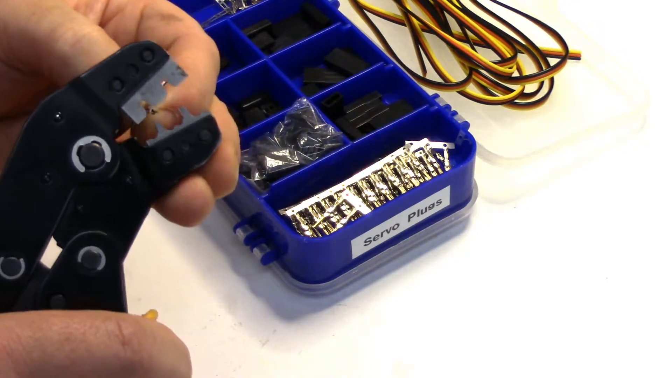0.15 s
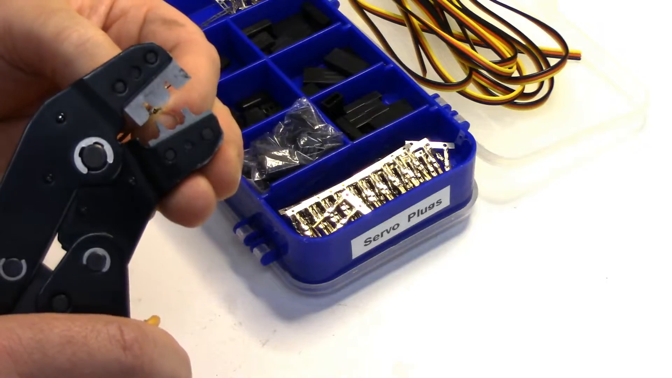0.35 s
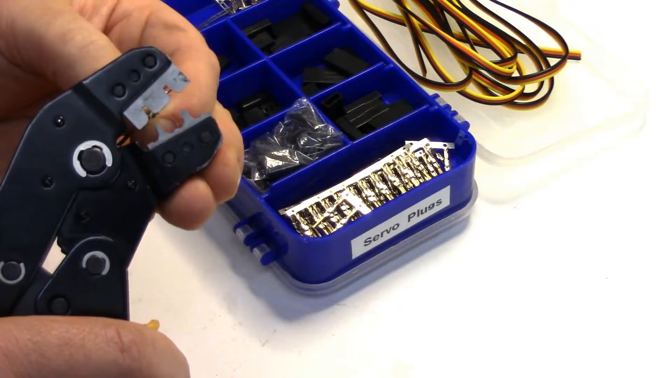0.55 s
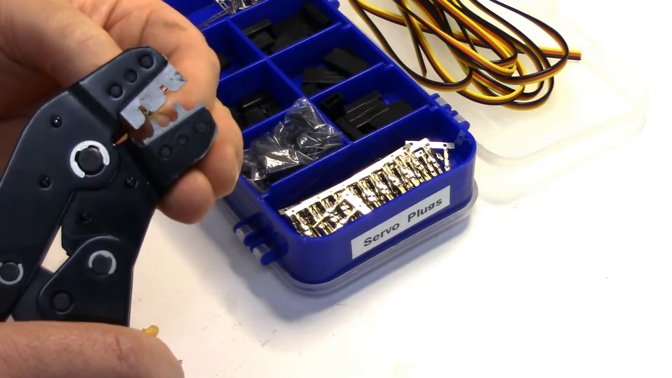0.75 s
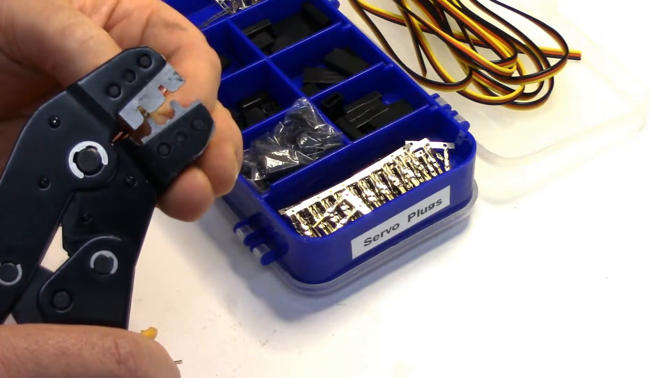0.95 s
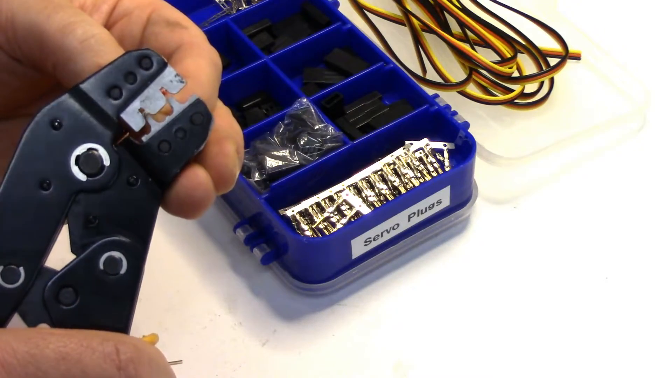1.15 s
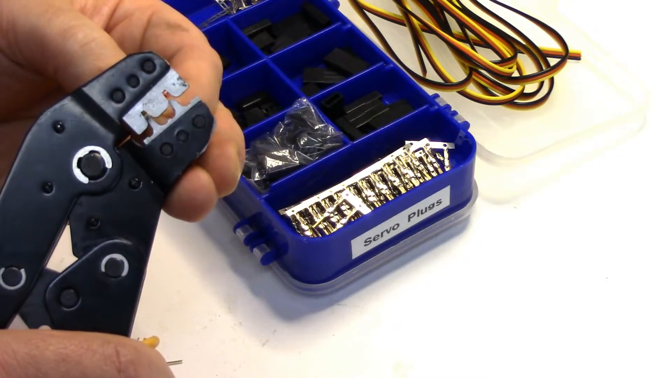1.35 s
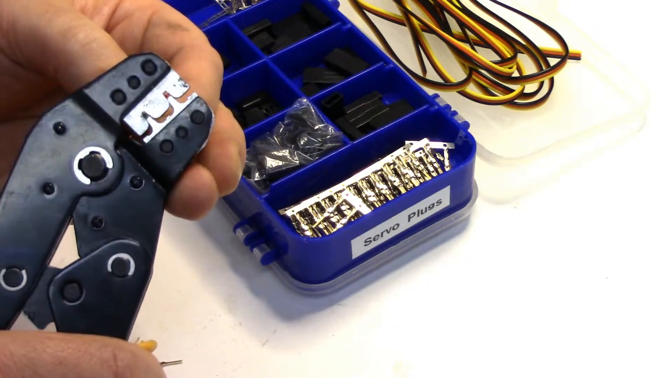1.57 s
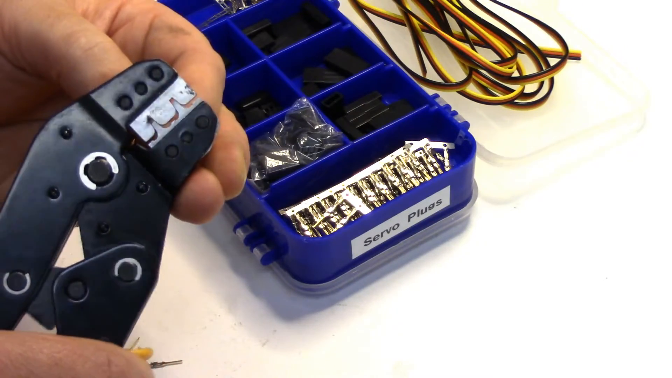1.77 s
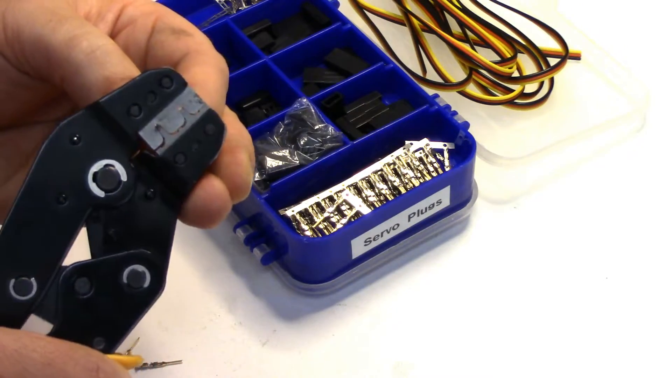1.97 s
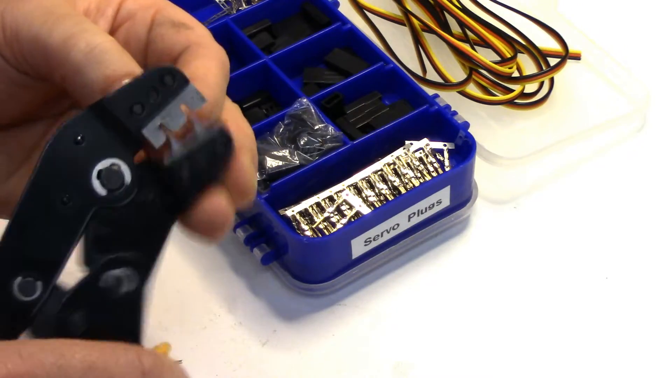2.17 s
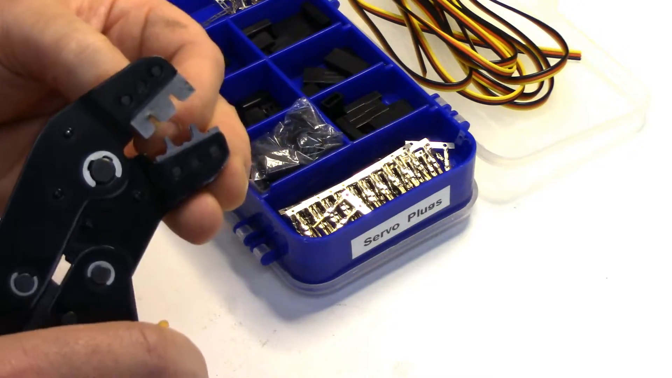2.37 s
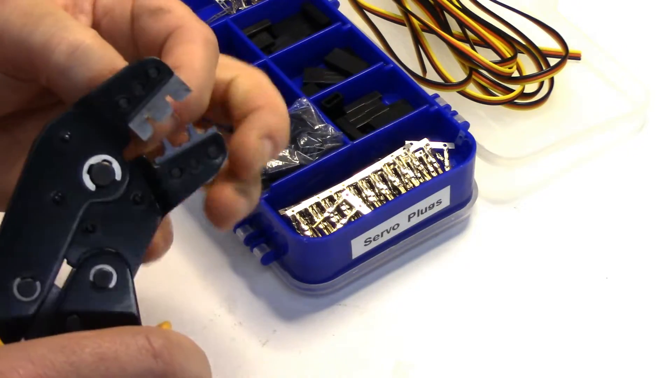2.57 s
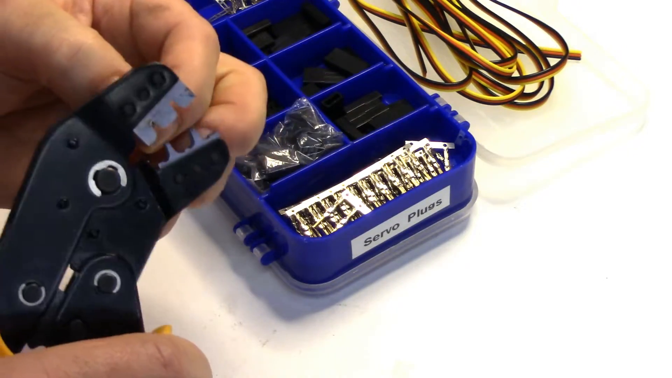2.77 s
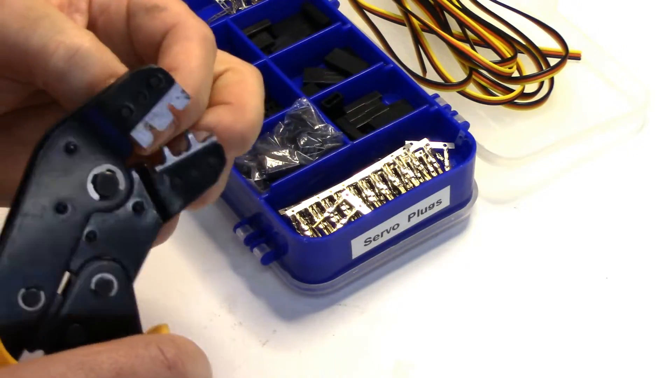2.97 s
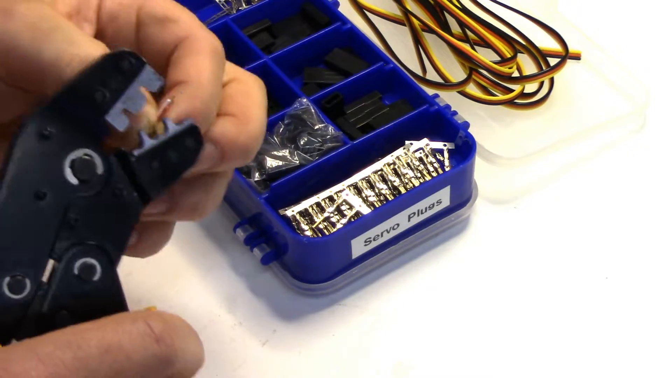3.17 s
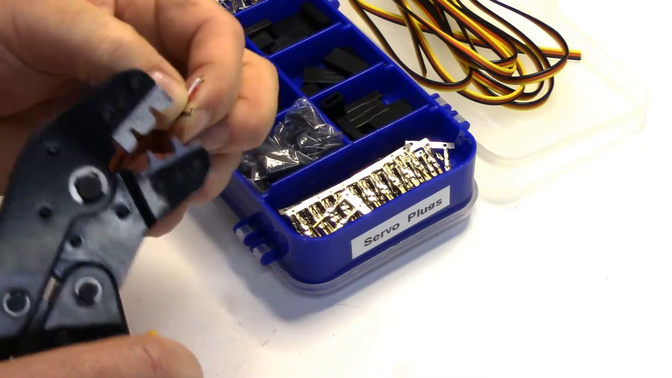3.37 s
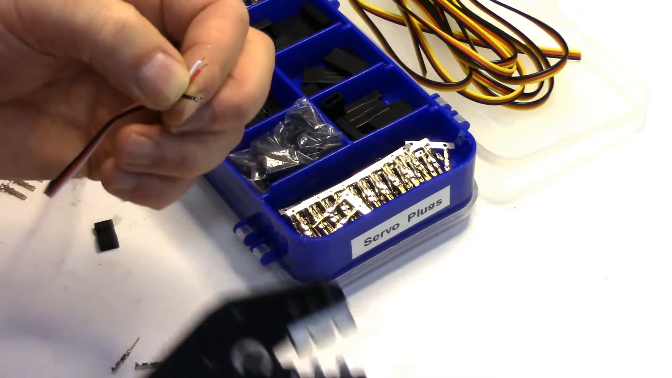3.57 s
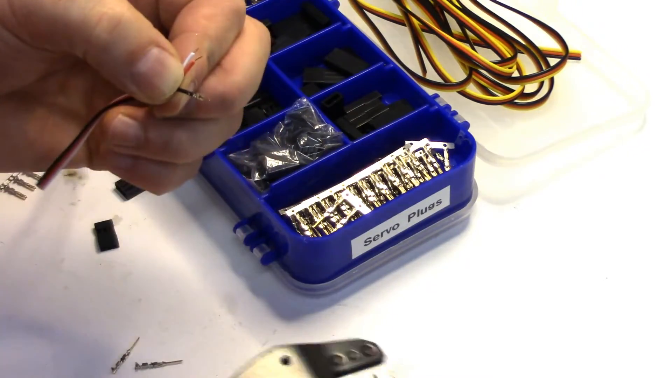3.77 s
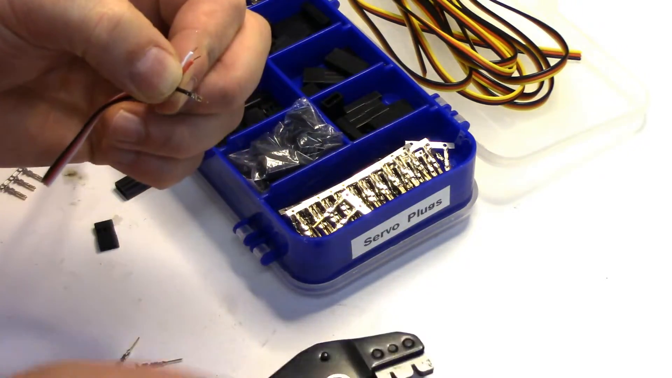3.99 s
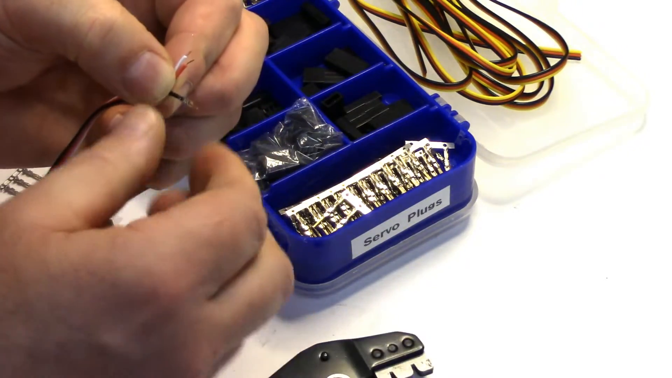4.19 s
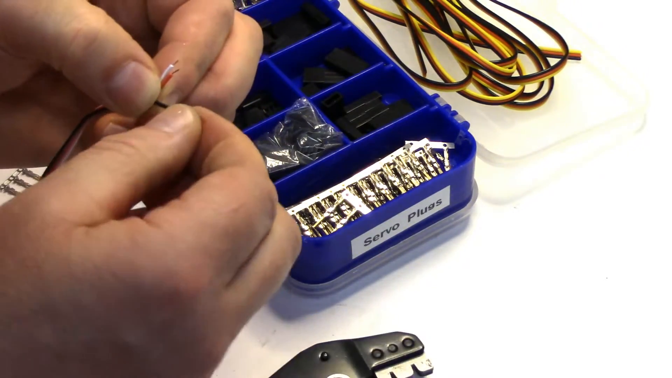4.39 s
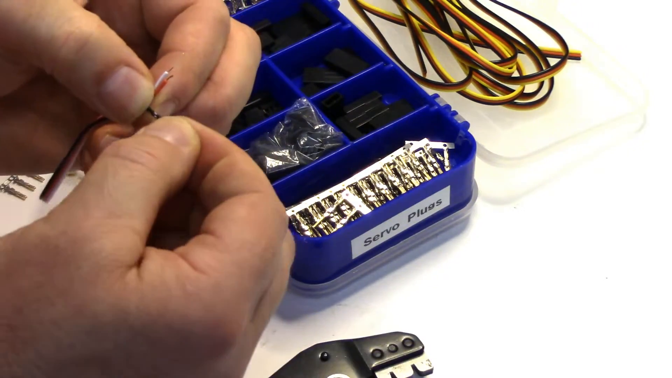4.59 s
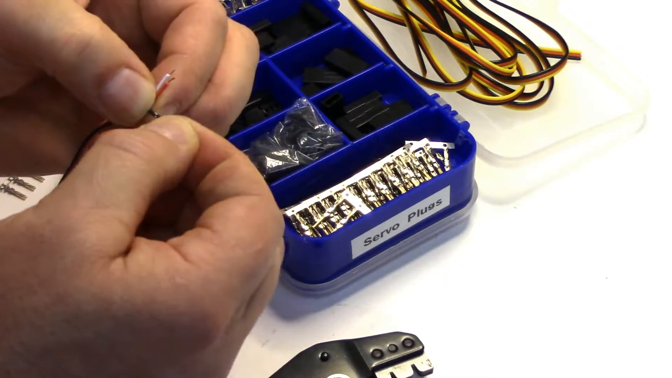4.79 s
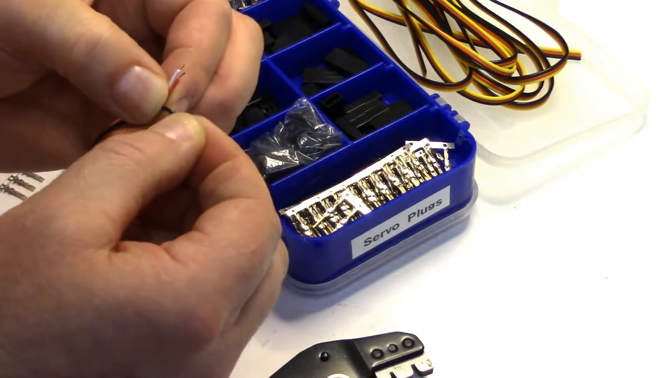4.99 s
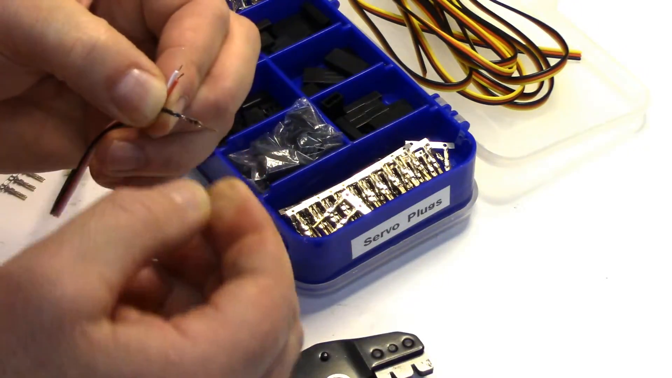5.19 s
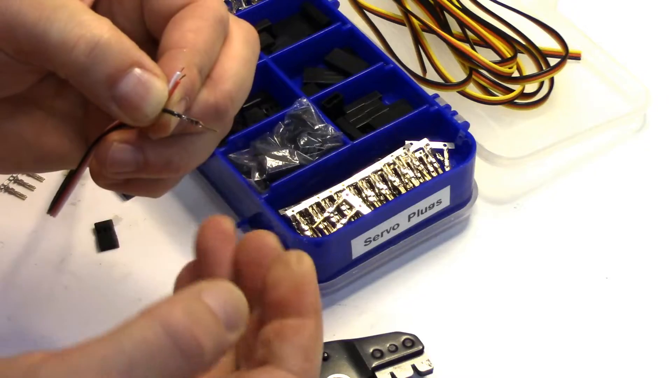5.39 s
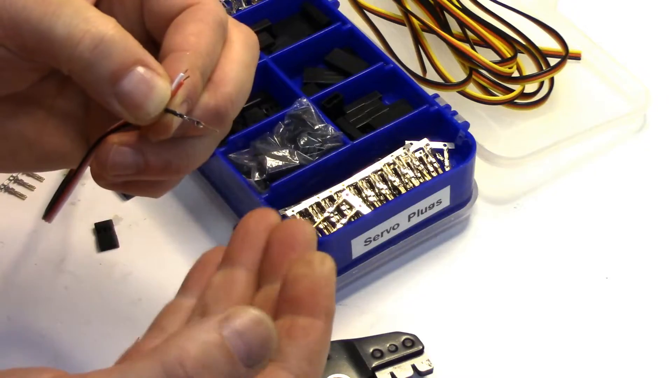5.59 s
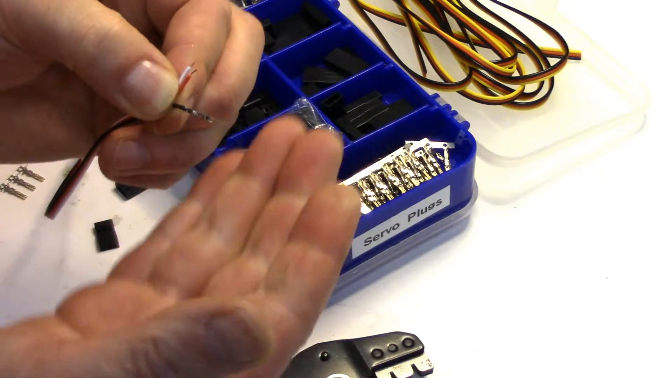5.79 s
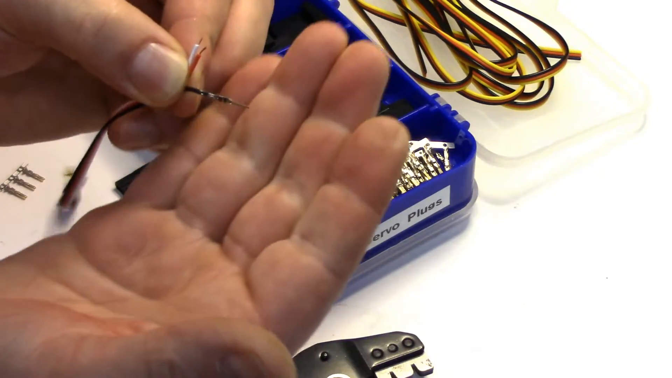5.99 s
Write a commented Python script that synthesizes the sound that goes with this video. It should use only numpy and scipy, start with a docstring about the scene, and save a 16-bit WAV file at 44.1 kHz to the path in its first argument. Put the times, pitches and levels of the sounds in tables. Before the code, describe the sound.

Close stereo microphones in a small live room with soft fan air and low hum. A hand crimper gives one bright steel click at about one second, more clicks, then a hard double snap as the jaws close. The spring throws it open with a rapid rattle and thin singing ring. The tool then thuds and clacks onto a wooden bench, rocking to rest; faint pips continue over the hiss.

```python
"""Fan air, hum and a low drone are heard first, with a faint spring tone; then a steel ratchet crimper is squeezed:
its pawl snaps over teeth, the jaws close, the handles stop, and the spring throws them open with a rattle.
The tool drops on a wooden bench and rocks to rest, among faint pips. Impacts are noise bursts through filters
plus decaying sine modes; the spring is a sine of shivering pitch; the air and rubs are coloured noise.
A small live room answers the impacts and pips, and two close microphone ports receive the whole."""
import sys
import numpy as np
from scipy import signal
from scipy.fft import rfft, irfft, next_fast_len
from scipy.io import wavfile
from scipy.ndimage import map_coordinates

SR = 44100
rng = np.random.default_rng(int(sys.argv[2]) if len(sys.argv) > 2 else 0)


def store_pcm(level_fs):
    """Save levels as 16-bit WAV."""
    pcm = np.round(np.clip(level_fs, -1, 1) * 32767).astype(np.int16)
    wavfile.write(sys.argv[1], SR, np.atleast_2d(pcm).T)


N = 266760
T = np.arange(SR) / SR  # time since a contact, s

# The pawl drops over one ratchet tooth. Each row: start in seconds, strength in dB, brightness in dB per octave.
TOOTH_SNAPS = [(1.1612, 8, 3), (1.4797, 6.5, 1.5), (1.589, 4, 2), (1.815, 4.5, 1.66)]
TOOTH_RING_DB = -35  # frame ring against the crack
# The jaws bottom out in two steps. Each row: start in seconds, strength in dB.
JAW_CLOSINGS = [(1.8506, 5.5), (1.8732, 12)]
# Frame ring, brightness per octave, ring of the clamped jaws, all against the closing's strength
CLOSE_RING_DB, CLOSE_TILT_DB, JAW_DB = -40, 1.5, -23.5
STOP_S, STOP_DB, STOP_JAW_DB = 1.887, -12, -20.5  # handles reach their stop: time, thump, jaw ring
# The released linkage rattles open: start, strength, spacing, brightness per octave gained at each contact
OPEN_S, OPEN_DB, RATTLE_GAP_S, RATTLE_BRIGHTEN_DB = 2.2192, 7, .0053, .6
OPEN_RING_DB, OPEN_TILT_DB = -35.5, 0.66  # frame ring; brightness per octave of the first contact
# Light touches of wire and loose links. Each row: start in seconds, strength in dB.
LIGHT_TICKS = [(0.706, -35), (0.721, -33), (2.169, -28.5), (2.191, -17), (3.14, -27.5), (3.176, -28),
               (3.202, -29.5), (3.341, -39)]
TICK_RING_DB, TICK_TILT_DB = -30, 0.5  # frame ring; brightness per octave
# Modes of the steel frame. Each row: frequency in Hz, relative level in dB, t60 in seconds before damping.
FRAME_MODES = [(2035, -6.5, .22), (2145, -7, .22), (2950, -2, .2), (3220, 4.5, 0.0677), (3400, -7.5, 0.076),
               (3640, -6, 0.15), (3920, -3, .2), (4620, -6, 0.085), (5730, -1, .12), (5988, -12.5, 0.44),
               (6460, -1.5, .08), (7055, -4.5, .08), (8070, -2, .11), (10075, -4.5, 0.088)]
# Modes of the clamped jaws. Each row: frequency in Hz, relative level in dB, t60 in seconds before damping.
JAW_MODES = [(1640, 6, 0.053), (1793, -2, 0.18), (1856, -3, .2), (2980, -4.5, .14), (3380, 13, .04),
             (3350, 5, .05), (5870, 5.5, 0.065), (5700, -14.5, 0.69), (6840, 5, .05)]
# Spectrum of the steel crack. Each row: frequency in Hz, relative density in dB per Hz, before any tilt.
CRACK_COLOUR = [(100, -33.5), (600, -28.5), (1200, -8.5), (2000, -6), (3200, 2.5), (4300, -4), (6200, 1),
                (8000, -3.5), (10000, -8), (12000, -9), (14500, -15), (16300, -30)]

# The return spring sings. Each row: start in seconds, level in dB, frequency in Hz, t60 in seconds.
SPRING_TONES = [(0.0, -57, 3630, 0.58), (1.071, -51.5, 3600, 0.19), (1.162, -43, 3680, 0.41),
                (2.222, -32.5, 3700, 0.57), (2.425, -41.5, 3810, 0.28)]
SPRING_WAVER_HZ = 99.7  # rms shiver of its pitch
COIL_HZ, COIL_DB, COIL_T60_S = 948, -49, 1.2  # its low mode, woken as the tool shuts and opens

# The tool lands and rocks on the bench. Each row: start in seconds, strength in dB,
# steel clack of the first contact against the thump in dB, frequency that the spot favours in Hz.
BENCH_LANDINGS = [(3.8737, 16, -24, 577), (3.912, 11, -33, 680), (3.9633, 6.5, -39, 390),
                  (3.976, 10, -35, 380), (4.003, 11, -12, 517), (4.039, 7.5, -27, 390),
                  (4.083, 0, -44, 394), (4.1776, -1.5, -48, 420)]
# Head, handle and rebound of one landing. Each row: delay in seconds, level in dB,
# brightness in dB per octave before dulling.
CONTACTS = [(0, -2, 2.5), (.0039, 0.5, -.5), (.0165, -5.5, 0.5)]
CLACK_LOSS_DB = 8  # less steel in each later contact
SOFT_BELOW_DB, DULLING = 4.5, 0.99  # a gentler landing loses this many dB per octave for each dB
BOARD_DB, SPOT_DB = -23.5, 7.5  # bench modes against the thump; lift of the modes a spot favours
# Modes of the bench top. Each row: frequency in Hz, relative level in dB, t60 in seconds before damping.
BENCH_MODES = [(115.5, -1, .55), (196.6, -4.5, 0.44), (308.8, -6, 0.3), (351, 3.5, 0.2), (382.7, 4, 0.29),
               (420, -2.5, 0.28), (449, -1, 0.3), (520, -12, 0.42), (591, 3.5, 0.33), (654, 0, 0.17),
               (724, 4.5, 0.19), (962, -3.5, 0.27), (1050, -4, 0.25), (1208, -3, 0.18), (1268, -3, 0.47),
               (1963, -9, 0.32), (2910, -10, 0.13)]
# Spectrum of a thump. Each row: frequency in Hz, relative density in dB per Hz, before any tilt.
KNOCK_COLOUR = [(25, -26.5), (55, -32), (100, -15), (220, -5), (390, 1.5), (640, 0), (900, -3.5),
                (1400, -8), (2000, -12.5), (3000, -17.5), (4200, -32), (8000, -46), (15000, -62.5)]

# Faint pips, about five a second. Each row: start in seconds, frequency in Hz.
FAINT_PIPS = [(3.5615, 2040), (3.5976, 1830), (3.7504, 2093), (4.352, 2090), (4.5513, 2050), (4.801, 2066),
              (5.001, 2070), (5.1517, 2056), (5.336, 2070), (5.5516, 2070), (5.7846, 2060), (5.9359, 2080)]
PIP_DB, PIP_HALF_S = -42.5, 0.0013  # level of the first in each stutter; Gaussian half length
STUTTER_GAP_S, STUTTER_LOSS_DB, STUTTER_SAG_HZ = .047, 6, 70  # mean gap; loss and sag at each repeat

# Fingers shift their grip. Each row: centre in seconds, level in dB, scale frequency in Hz,
# Gaussian half length in seconds.
FINGER_RUBS = [(1.72, -60, 200, .09), (2.56, -51, 800, 0.031), (2.667, -54, 653, .025),
               (5.552, -52, 1560, 0.019)]
# Spectrum of fan air. Each row: frequency in Hz, relative density in dB per Hz.
AIR_COLOUR = [(20, -27.5), (45, -22.5), (65, -13), (85, -16.5), (120, -8), (160, -8), (240, -2), (400, -4),
              (800, -8), (1500, -10.5), (3000, -19), (7000, -26.5), (11500, -34), (15000, -60)]
# Mains and fan hum lines. Each row: frequency in Hz, rms level of the steady tone in dB.
HUM_LINES = [(120, -71), (241, -67.5), (840, -65)]
# Reverberation of the room. Each row: frequency in Hz, t60 in seconds.
ROOM_DECAY = [(100, .7), (400, 0.57), (1200, .48), (3500, .46), (7000, 0.39), (11000, 0.29), (16000, 0.096)]
# Spectrum of each microphone's own noise. Each row: frequency in Hz, relative density in dB per Hz.
HISS_COLOUR = [(15, -43), (25, -14.5), (257, -1.5), (335, -3), (462, -2), (604, -4.5), (1630, -14),
               (2020, -13), (2850, -19.5), (15000, -31)]
TOP_HZ = 16300  # band limit


def ratchet(rattle_count=5):
    """Serial impact: each arrested motion of pawl, jaws, handles and linkage excites the steel afresh."""
    out = np.zeros((2, N))
    for s, db, tilt_db in TOOTH_SNAPS:
        add(out, s, amp(db) * snap(TOOTH_RING_DB, tilt_db))

    for s, db in JAW_CLOSINGS:
        closing = snap(CLOSE_RING_DB, CLOSE_TILT_DB) + amp(JAW_DB) * jaws()
        add(out, s, amp(db) * closing)

    blow = burst(t60=0.027, spike_db=-0.5) + room_tail(wet_db=-12.5, build_s=.006)
    thump = coloured(blow, KNOCK_COLOUR, tilt_db=-3.5)
    add(out, STOP_S, amp(STOP_DB) * thump + amp(STOP_JAW_DB) * jaws())

    for k in range(rattle_count):
        tilt_db = OPEN_TILT_DB + k * RATTLE_BRIGHTEN_DB
        add(out, OPEN_S + k * RATTLE_GAP_S, amp(OPEN_DB) * snap(OPEN_RING_DB, tilt_db))

    for s, db in LIGHT_TICKS:
        add(out, s, amp(db) * snap(TICK_RING_DB, TICK_TILT_DB))
    return low_cut(out, hz=120)


def snap(ring_db, tilt_db):
    """Steel on steel: a crack, scattered by hands, box and bench, sounds together with the frame's modal ring."""
    contact = burst(t60=.014, spike_db=-8)
    nearby = amp(-5) * burst(t60=0.081, spike_db=-30)
    tail = room_tail(wet_db=-12.5, build_s=0.0064)
    crack = coloured(contact + nearby + tail, CRACK_COLOUR, tilt_db)
    frame = in_room(ring(FRAME_MODES, damping=1.3, scatter_db=2), wet_db=-9, build_s=.003)
    return crack + amp(ring_db) * frame


def jaws():
    """Modal vibration under clamping: the closed jaws form one body with its own set of modes."""
    swell = 1 - np.exp(-T / 0.00053)
    modes = ring(JAW_MODES, damping=1.6, scatter_db=2)
    return in_room(swell * modes, wet_db=-10, build_s=.006)


def spring():
    """Free vibration: the coil sings when stretched or let go; closing and release also wake its low mode."""
    out = np.zeros((2, N))
    for s, db, hz, t60 in SPRING_TONES:
        add(out, s, amp(db) * sing(hz, SPRING_WAVER_HZ, t60))
    for s in (JAW_CLOSINGS[-1][0], OPEN_S):
        add(out, s, amp(COIL_DB) * sing(COIL_HZ, waver_hz=4.1, t60=COIL_T60_S))
    return out


def sing(hz, waver_hz, t60):
    """Frequency modulation: phase is the integral of a shivering pitch, under an exponential decay."""
    pitch = hz + waver_hz * noise(lambda f: 1 / (1 + (f / 250) ** 2), SR)
    tone = np.sin(2 * np.pi * np.cumsum(pitch) / SR)
    onset = 1 - np.exp(-T / .003)
    return tone * fade(t60) * onset


def bench():
    """Repeated impact of a rocking body: head, handle, rebound; gentle contacts excite less treble."""
    out = np.zeros((2, N))
    for s, db, clack_db, spot_hz in BENCH_LANDINGS:
        dull_db = DULLING * max(SOFT_BELOW_DB - db, 0)
        for k, (delay_s, part_db, tilt_db) in enumerate(CONTACTS):
            blow = bench_blow(clack_db - k * CLACK_LOSS_DB, tilt_db - dull_db, spot_hz)
            add(out, s + delay_s, amp(db + part_db) * blow)
    return low_cut(out, hz=86.0)


def bench_blow(clack_db, tilt_db, spot_hz):
    """Position-dependent excitation: each spot favours its own bench modes; bare steel adds a clack."""
    thud = burst(t60=.03, spike_db=-10) + room_tail(wet_db=-6.5, build_s=0.004)
    knock = coloured(thud, KNOCK_COLOUR, tilt_db)
    steel = burst(t60=0.0137, spike_db=-12) + room_tail(wet_db=-13.5, build_s=0.0022)
    clack = coloured(steel, CRACK_COLOUR, tilt_db=0.0)

    modes = []
    for hz, db, t60 in BENCH_MODES:
        octaves = np.log2(hz / spot_hz)
        modes.append((hz, db + SPOT_DB * np.exp(-(octaves / 0.358) ** 2), t60))
    board = in_room(ring(modes, damping=1.65, scatter_db=2.5), wet_db=-23.0, build_s=0.0083)
    return knock + amp(clack_db) * clack + amp(BOARD_DB) * board


def pips(count=3):
    """Gaussian tone bursts: soft-edged and a few cycles long, each repeated weaker and lower."""
    out = np.zeros((2, N))
    for s, hz in FAINT_PIPS:
        gap_s = STUTTER_GAP_S * rng.uniform(.75, 1.25)
        for k in range(count):
            envelope = np.exp(-((T - .0022) / PIP_HALF_S) ** 2)
            pip = envelope * np.sin(2 * np.pi * (hz - k * STUTTER_SAG_HZ) * T)
            heard = in_room(pip, wet_db=-6.5, build_s=0.0019)
            add(out, s + k * gap_s, amp(PIP_DB - k * STUTTER_LOSS_DB) * heard)
    return out


def fingers():
    """Sliding friction: skin on grip and wire gives band-shaped noise that swells and subsides."""
    now = np.arange(N) / SR
    out = np.zeros(N)
    for s, db, hz, half_s in FINGER_RUBS:
        rub = noise(lambda f: f / hz / (1 + (f / hz) ** 3), N)
        out += amp(db) * np.exp(-((now - s) / half_s) ** 2) * rub
    return out


def background():
    """Stationary noise and tones: fan air, unsteady hum lines, a drone that fades, a thin whine that sets in."""
    now = np.arange(N) / SR
    air = amp(-56) * noise(lambda f: amp(along(AIR_COLOUR, f)), N)
    hum = np.zeros(N)
    for hz, db in HUM_LINES:
        tone = np.sqrt(2) * np.sin(2 * np.pi * hz * now)
        hum += amp(db) * (tone + 0.36 * band(hz, 22, N))
    # the drone fades from the late squeeze until after the handles open
    drone_db = np.interp(now, [0, 1.7, 2.6], [-61, -61, -78])
    drone = band(278, 35, N) + amp(-1.5) * band(230, 170, N)
    whine = amp(-82.0) * np.interp(now, [3.5, 3.7], [0, 1]) * band(5600, 35, N)
    return air + hum + amp(drone_db) * drone + whine


def burst(t60, spike_db):
    """Impact as an impulse plus decaying noise, the sum of countless damped modes; unit energy."""
    chatter = rng.standard_normal(SR) * fade(t60)
    spike = np.arange(SR) == SR // 2000  # half a millisecond in
    push = chatter / np.linalg.norm(chatter) + amp(spike_db) * spike
    return push / np.linalg.norm(push)


def ring(modes, damping, scatter_db):
    """Modal superposition: damped sines at random strengths and signs; contact divides each t60 by damping."""
    out = np.zeros(SR)
    for hz, db, t60 in modes:
        strength, sign = rng.standard_normal(2)
        wave = np.sign(sign) * np.sin(2 * np.pi * hz * T)
        out += amp(db + scatter_db * strength) * wave * fade(t60 / damping)
    return out / np.linalg.norm([amp(db) for _, db, _ in modes])


def coloured(x, colour, tilt_db, uneven_db=2.6):
    """Minimum-phase filter of unit energy: a tilted spectrum, its upper modes woken unevenly by each blow."""
    hz = np.fft.rfftfreq(SR, 1 / SR)
    bumps = map_coordinates(rng.standard_normal(400), [hz / 70], mode="nearest")
    crowd = bumps * hz / (hz + 1200)  # grows with frequency
    level_db = along(colour, hz) + tilt_db * np.log2(hz + 100) + uneven_db * crowd
    cepstrum = irfft(np.log(amp(level_db)), SR)
    cepstrum[1:SR // 2] *= 2  # folding the cepstrum makes the filter causal
    cepstrum[SR // 2 + 1:] = 0
    response = irfft(np.exp(rfft(cepstrum)), SR)[:SR // 10]
    return signal.fftconvolve(x, response[None] / np.linalg.norm(response), axes=1)[:, :SR]


def room_tail(wet_db, build_s):
    """Diffuse reverberation: stereo noise that builds up as the walls answer, then decays by frequency."""
    hz, t, spectra = signal.stft(rng.standard_normal((2, SR)), SR, nperseg=256)
    decay = amp(-60 * t / along(ROOM_DECAY, hz)[:, None])
    tails = signal.istft(spectra * decay, SR, nperseg=256)[1][:, :SR]
    tails = tails * (1 - np.exp(-T / build_s))
    common, apart = tails / np.linalg.norm(tails[0])
    return amp(wet_db) * diffuse(common, apart, apart_db=-6)


def in_room(sound, wet_db, build_s):
    """Reverberation as convolution: the direct sound plus the room's answer to it."""
    return sound + signal.fftconvolve(sound[None], room_tail(wet_db, build_s), axes=1)[:, :SR]


def diffuse(common, apart, apart_db):
    """Spatial coherence: sound from all sides reaches the two ports less alike as its pitch rises."""
    side = filtered(apart, lambda f: amp(apart_db) * (f + 500) / (f + 6000))
    return common + np.array([side, -side])


def at_ports(sound, lag_s=2.6e-5):
    """Interchannel delay as linear phase: the right one of two close ports hears a moment earlier."""
    return filtered(sound, lambda f: np.exp(1j * np.pi * f * lag_s * np.array([[-1], [1]])))


def low_cut(x, hz):
    """Radiation efficiency: small bodies radiate little deep bass."""
    return signal.sosfilt(signal.butter(4, hz, "high", fs=SR, output="sos"), x)


def noise(gain, size):
    """Spectral shaping: white noise through a gain over frequency, at rms 1."""
    return unit(filtered(rng.standard_normal(size), gain))


def band(hz, width_hz, size):
    """Narrow-band noise around one frequency, at rms 1."""
    return noise(lambda f: 1 / (1 + (2 * (f - hz) / width_hz) ** 4), size)


def filtered(x, response):
    """Linear filtering: the spectrum is multiplied by a response of frequency."""
    n = x.shape[-1]
    m = next_fast_len(n + SR // 4)
    return irfft(rfft(x, m) * response(np.fft.rfftfreq(m, 1 / SR)), m)[..., :n]


def fade(t60):
    """Exponential damping: a decay of 60 dB in t60 seconds."""
    return np.exp(-np.log(1000) * T / max(t60, 1e-4))


def along(points, hz):
    """Interpolation of (Hz, value) points on a logarithmic frequency axis."""
    f, v = np.transpose(points)
    return np.interp(np.log(hz + 1), np.log(f + 1), v)


def amp(db):
    """Decibels to amplitude gain."""
    return 10 ** (np.asarray(db) / 20)


def unit(x):
    """Normalization to rms 1."""
    return x / np.sqrt(np.mean(x ** 2) + 1e-20)


def add(track, s, sound):
    """Superposition: mix a sound into a stereo track at s seconds."""
    start = max(round(s * SR), 0)
    part = sound[..., :max(N - start, 0)]
    track[:, start:start + part.shape[-1]] += part


def scene():
    """Superposition of all sources as they reach the two ports."""
    tool = ratchet() + spring() + bench()
    return at_ports(tool + pips() + fingers() + background())


def record(dry):
    """Transduction: independent hiss per microphone, smooth saturation of the highest peaks, a band limit."""
    hiss = np.array([noise(lambda f: amp(along(HISS_COLOUR, f)), N) for _ in dry])
    x = dry + amp(-59.5) * hiss
    x = x / (1 + np.abs(x / .97) ** 6) ** (1 / 6)
    return filtered(x, lambda hz: hz < TOP_HZ)


dry = scene()
out = record(dry)
store_pcm(out)
```